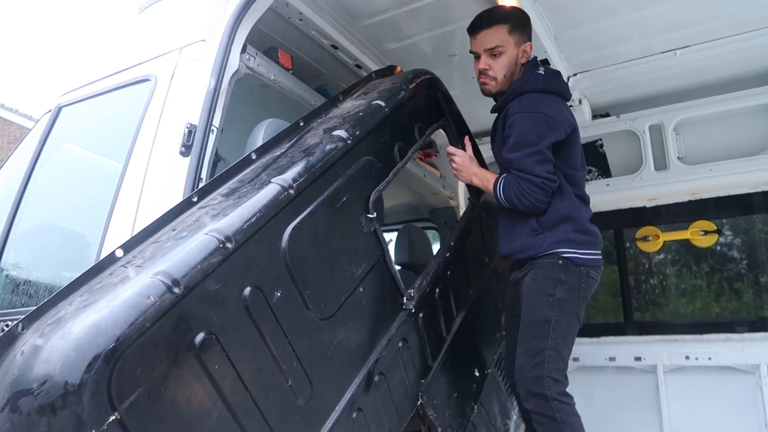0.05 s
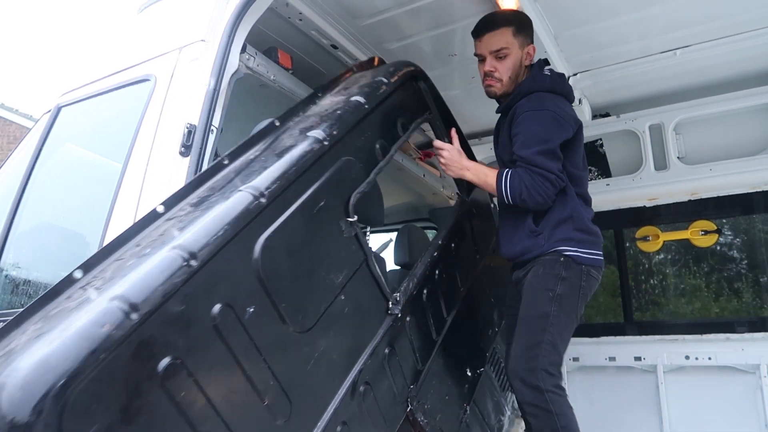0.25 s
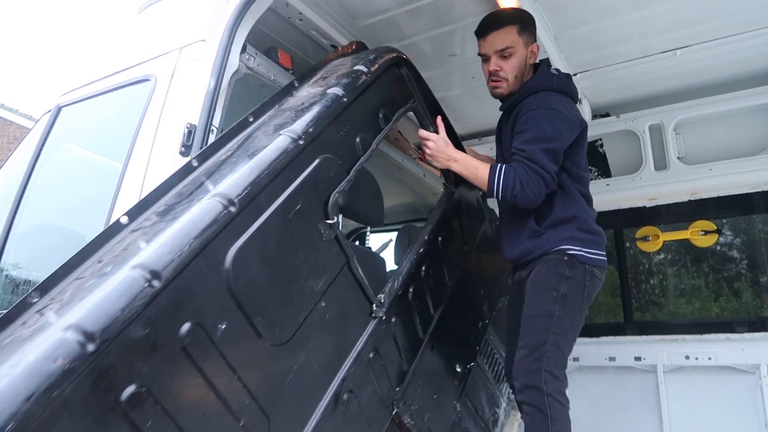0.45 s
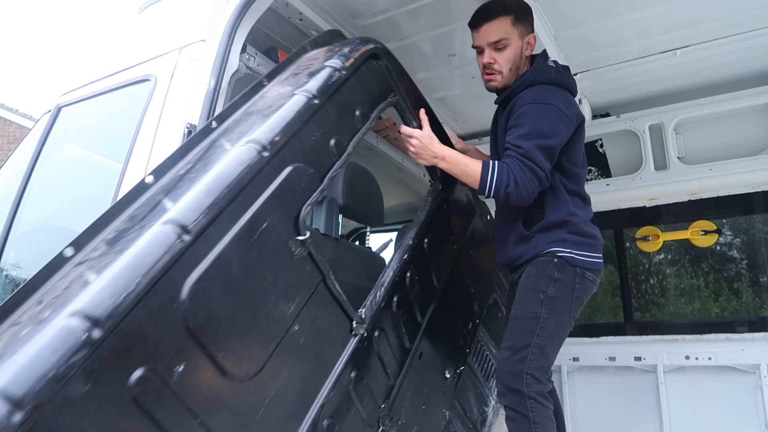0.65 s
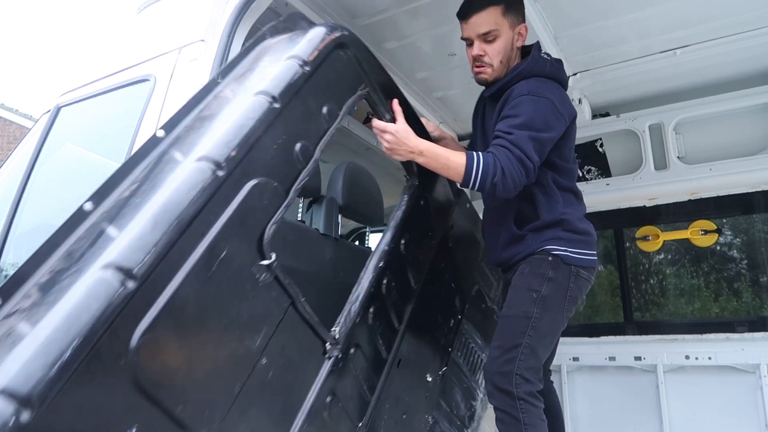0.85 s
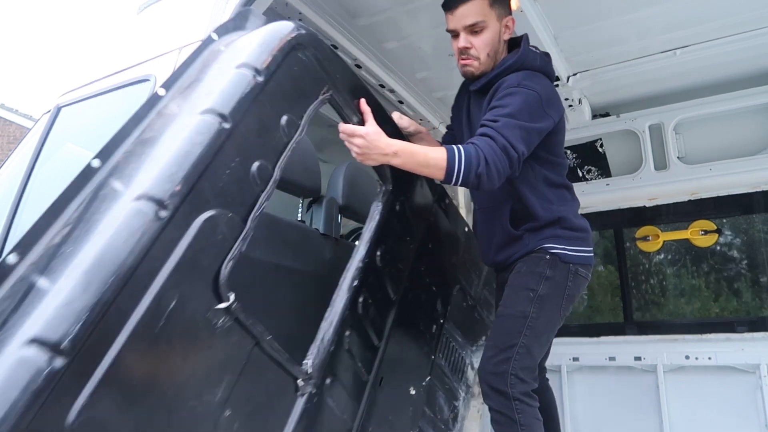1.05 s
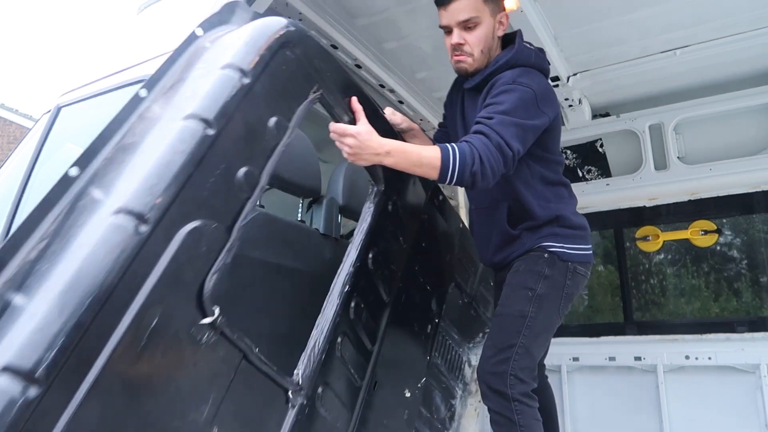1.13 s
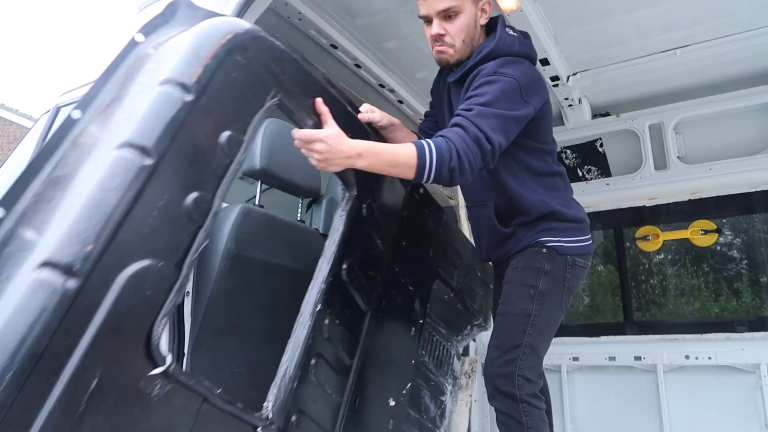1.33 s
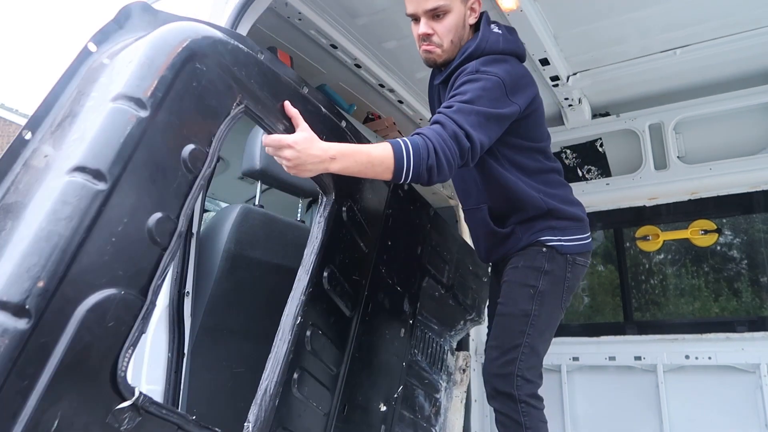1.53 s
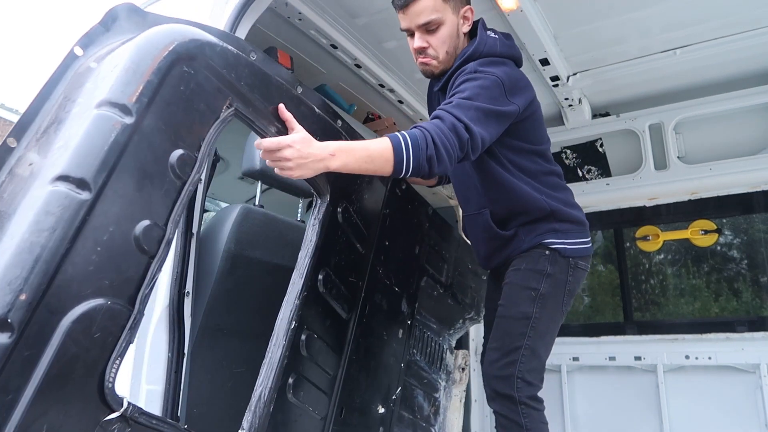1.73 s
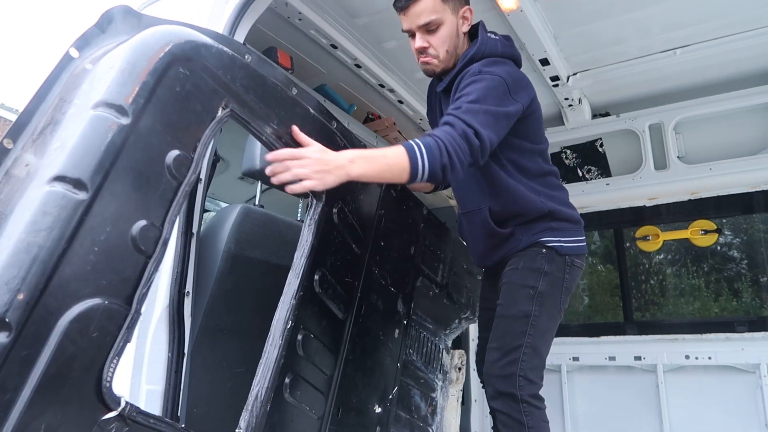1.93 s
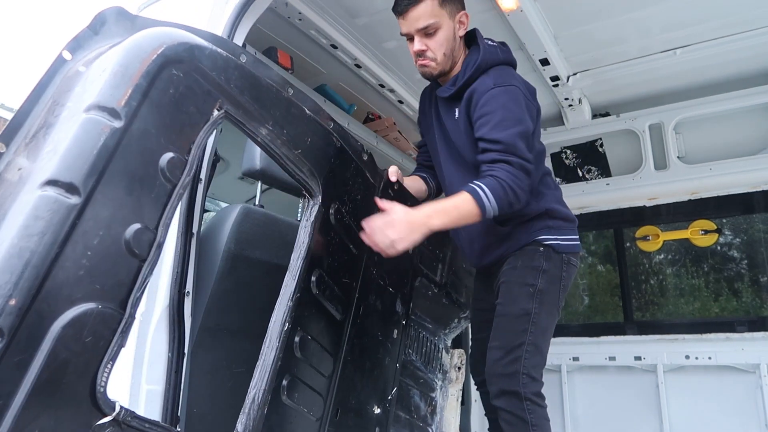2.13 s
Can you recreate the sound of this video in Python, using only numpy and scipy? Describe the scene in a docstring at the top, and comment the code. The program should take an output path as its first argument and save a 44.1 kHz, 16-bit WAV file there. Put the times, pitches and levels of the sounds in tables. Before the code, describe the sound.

Close up, a big steel sheet scrapes and judders over the floor of an empty van. Its edge keeps catching with ringing clanks and short squeaks while the sheet booms, until the drag fades into a few faint knocks.

```python
"""A large bulkhead panel is dragged across the bare cargo bay of a van, heard from close by.
Stick-slip friction at its edge drives the sheet's modes into a rumble, a scrape and brief squeaks.
Where the edge catches, impacts clank, rattle and set steel parts ringing; the sheet booms as it
buckles. The bay reverberates briefly, and a few fainter knocks and low booms follow as the scrape
dies away. Beneath it all lies a quiet outdoor background."""
import sys
import numpy as np
from scipy import signal
from scipy.fft import rfft, irfft
from scipy.io import wavfile
from scipy.ndimage import uniform_filter1d

SR = 44100
rng = np.random.default_rng(int(sys.argv[2]) if len(sys.argv) > 2 else 0)


def wav_record(signal):
    """Record a signal, one row per channel, as 16-bit PCM in the file named by sys.argv[1]."""
    frames = np.transpose(np.atleast_2d(signal))
    bounded = np.clip(frames, -1, 1)
    # unit amplitude maps onto the largest positive 16-bit level
    quanta = np.round(bounded * 32767).astype(np.int16)
    wavfile.write(sys.argv[1], SR, quanta)


N = 97020
T = np.arange(N) / SR
MID_ONLY = np.array([[1], [0]])  # signal rows are mid and side

# catches of the edge: t/s, body level/dB, clank level/dB, treble level/dB, rattle decay time/s
CATCHES = [(.229, -29.5, -29.5, -32.5, 0.045), (0.3758, -20, -18.5, -23.5, 0.0034),
           (0.386, -19, -27.5, -36, .004), (.397, -19, -20.5, -23.5, 0.0076),
           (0.4224, -20.5, -27, -19, 0.011), (.443, -24, -31, -40, 0.0039), (0.53, -29, -34, -32, .012),
           (.546, -33, -36, -35.5, 0.0062), (0.666, -39, -46, -28, 0.0068),
           (.675, -29.5, -28.5, -25.5, .022), (0.716, -24.5, -26.5, -25, 0.0059),
           (.756, -41, -33, -21, 0.018), (0.8, -32, -31, -33, 0.0039), (.875, -22.5, -27, -44, 0.011),
           (.915, -24.5, -20.5, -15.5, 0.021), (.929, -18.5, -25, -30, 0.018), (1.067, -23, -27, -52, .025),
           (1.126, -31, -22, -47, 0.0062), (1.138, -29, -26.5, -35, 0.0092),
           (1.204, -25.5, -31, -26.5, 0.026), (1.27, -26.5, -28, -34, 0.013),
           (1.425, -26.5, -31, -52, 0.014), (1.468, -41, -31.5, -36, 0.037),
           (1.523, -28.5, -24.5, -35, 0.015), (1.553, -27.5, -32, -18, 0.0027),
           (1.559, -22.5, -18, -18.5, 0.0016), (1.709, -39, -53, -40, .0014),
           (1.989, -45.5, -43.5, -43.5, 0.0044)]
# treble spectrum of an impact: f/Hz, level/dB
TREBLE_SPECTRUM = [(300, -76), (2000, -18), (3600, 9), (4800, -1), (6500, -7), (8000, -12.5), (11500, -10),
                   (15000, -11.5)]


def amp(db):
    """Amplitude ratio of a level in decibels."""
    return 10 ** (np.asarray(db) / 20)


def unit(x):
    """Normalisation to rms 1."""
    return x / np.sqrt(np.mean(x ** 2) + 1e-20)


def unit_peak(x, window=882):
    """Normalisation of a transient to a greatest short-time rms of 1 in the mid signal."""
    return x / np.sqrt(uniform_filter1d(x[0] ** 2, window).max() + 1e-20)


def value_at(points, hz):
    """Interpolation on a logarithmic frequency axis."""
    f, value = np.transpose(points)
    return np.interp(np.log(hz + 1), np.log(f), value)


def add(mix, start_s, sound):
    """Superposition of a sound on the mix from a given time."""
    part = mix[:, max(round(start_s * SR), 0):][:, :sound.shape[-1]]
    part += sound[..., :part.shape[-1]]


def convolve(x, response):
    """Convolution with an impulse response, cut to the input's length."""
    return signal.fftconvolve(np.atleast_2d(x), np.atleast_2d(response), axes=1)[:, :x.shape[-1]]


def colour(x, spectrum, size=8192):
    """Minimum-phase filtering: the phase follows from the log gain by the Hilbert transform."""
    log_gain = np.log(amp(value_at(spectrum, abs(np.fft.fftfreq(size, 1 / SR)))))
    transfer = np.exp(np.conj(signal.hilbert(log_gain)))
    return convolve(x, np.fft.ifft(transfer).real[:size // 2])


def bay_response(size=22050):
    """Reverberation: direct sound, strong early reflections and a diffuse tail that decays by band."""
    # reverberation time of the steel bay: f/Hz, T60/s
    decay_times = [(80, 0.27), (260, 0.32), (700, 0.33), (1800, 0.17), (4800, 0.23), (12000, 0.15)]
    early_s, early_db, direct_db = 0.023, 3.5, -7
    hz, t, bands = signal.stft(rng.choice([-1., 1.], (2, size)), SR, nperseg=256)
    decay = amp(-60 * t / value_at(decay_times, hz)[:, None])
    response = signal.istft(bands * decay, SR, nperseg=256)[1][:, :size]
    response *= 1 + amp(early_db) * np.exp(-T[:size] / early_s)
    response /= np.linalg.norm(response[0])
    response[0, 0] += amp(direct_db)
    return response


def panel_resonance(drive):
    """Forced vibration: each mode of the sheet is a damped resonator that adds to the drive."""
    # bending modes: f/Hz, T60/s, gain/dB
    panel_modes = [(71.2, 1, -8), (81.8, 0.54, 13.5), (113.9, 0.51, 5.5), (157.7, 0.36, 0), (205.7, 0.3, 0),
                   (265.5, 0.42, -6.5), (385.7, 0.49, 4), (472, 0.077, -10.5), (630, 0.73, -7),
                   (737, 0.46, -5), (1079, 0.11, -2.5), (1210, 0.57, -1), (1410, 0.81, -10),
                   (1590, 0.88, -12), (2220, 0.14, -4), (2484, 0.44, -7), (3870, 0.22, 1)]
    out = drive
    for hz, t60, db in panel_modes:
        q = hz * t60 * np.pi / np.log(1000)
        out = out + amp(db) * signal.lfilter(*signal.iirpeak(hz, q, SR), drive)
    return out


def impulses(per_s, size, spread_db=4):
    """A Poisson process of small impacts of uneven strength."""
    strength = amp(spread_db * np.minimum(rng.exponential(1, size), 4))
    return strength * rng.choice([-1., 1.], size) * (rng.random(size) < per_s / SR)


def outdoors(level_db=-45):
    """Ambient noise, mostly low in pitch and only partly coherent between the two microphones."""
    # background spectrum: f/Hz, level/dB
    outdoor_spectrum = [(25, -39), (51, -2), (86, 10.5), (236, -7), (461, -10), (808, -13.5), (2230, -20.5),
                        (8720, -43), (12000, -41), (14900, -74)]
    # stereo width of the background: f/Hz, side level re mid/dB
    outdoor_width = [(60, -40), (370, -10), (2300, -10), (14000, 7)]
    mid, side = amp(level_db) * unit(colour(rng.standard_normal((2, N)), outdoor_spectrum))
    return mid, colour(side, outdoor_width)[0]


def tick(start_s=1.854, hz=1200, level_db=-27, decay_s=.0008):
    """A heavily damped oscillation right at the microphone: one small dry tick."""
    t = np.maximum(T - start_s, 0)
    return amp(level_db) * np.sin(2 * np.pi * hz * t) * np.exp(-t / decay_s)


def edge_squeaks(mix, reverb_db=5.5, size=11025):
    """Frictional excitation: each run of fast slips on bare metal drives one resonance of the edge."""
    # skids: t/s, level/dB, f/Hz, duration/s, quality factor Q
    skids = [(.376, -27, 3320, 0.0065, 7.6), (.423, -38.5, 4820, .02, 7.6), (.675, -25.5, 2710, 0.011, 8.7),
             (.665, -42, 11200, 0.039, 1.1), (.756, -33.5, 4660, 0.014, 18), (.756, -31.5, 3140, 0.013, 26),
             (.756, -28.5, 2410, 0.013, 12), (.752, -40, 5400, 0.033, 1.1), (.748, -44, 11500, 0.037, 3.1),
             (.789, -32.5, 1047, 0.013, 9), (1.072, -42, 11500, .032, 2.8), (1.137, -24.5, 977, 0.021, 9.6),
             (1.147, -39, 2300, .008, 9.6), (1.203, -41, 11400, 0.013, 4.5),
             (1.265, -44.5, 11900, 0.03, 6.2), (1.267, -40.5, 4200, .044, 4.5),
             (1.55, -21, 1720, 0.0053, 3.4), (1.558, -21.5, 1940, .018, 8.8),
             (1.993, -48.5, 2280, 0.021, 3.3)]
    for start_s, db, hz, length_s, q in skids:
        progress = np.minimum(T[:size] / length_s, 1)
        force = rng.standard_normal(size) * np.sin(np.pi * np.sqrt(progress))
        resonator = signal.iirpeak(hz, q, SR)
        ring = signal.lfilter(*resonator, signal.lfilter(*resonator, force))
        echo = amp(reverb_db) * convolve(ring, bay_response())
        add(mix, start_s, amp(db) * unit_peak(ring * MID_ONLY + echo))


def steel_rings(mix, rise_s=0.0056, reverb_db=-16, size=22050):
    """Free vibration: hollow steel parts struck by the edge swell into their modes and ring out."""
    # modes of the van's pillar and sill: f/Hz, level/dB, T60/s
    pillar = [(290.2, -5.5, 0.49), (390, 2.5, 0.27), (734.7, 2.5, 0.45), (1308, 0, 0.25), (1615, -9, 0.37),
              (2207, -15, .3), (2509, -2, 0.15)]
    sill = [(570.5, -2.5, 0.2), (621, -0.5, 0.31), (770, -9, 0.12), (1144, 0, 0.18), (1220, -7, 0.27),
            (1930, -13, 0.12), (2594, -5, 0.21), (2880, -7.5, 0.23), (3230, -5, 0.12), (3450, -15, .08),
            (3890, -23, 0.13)]
    blows = [(.3755, -20.5, pillar), (.4225, -24.5, pillar), (.915, -19.5, sill)]
    t = T[:size]
    for start_s, level_db, part in blows:
        ring = sum(amp(db - 60 * t / t60) * np.sin(2 * np.pi * (hz * t + rng.random()))
                   for hz, db, t60 in part)
        ring *= 1 - np.exp(-t / rise_s)
        echo = amp(reverb_db) * convolve(ring, bay_response())
        add(mix, start_s, amp(level_db) * unit_peak(ring * MID_ONLY + echo))


def contact_cracks(mix, decay_s=0.0024, size=4096):
    """Nonlinear contact: metal on metal begins with a dry crack that grows faster than the blow."""
    # spectrum of the crack: f/Hz, level/dB
    crack_spectrum = [(150, -24), (700, -3), (1500, 13.5), (2400, -8), (3700, -12), (5000, -22),
                      (8000, -30), (15000, -38)]
    hard_blow_db, growth = -16, 2.35  # growth in dB of crack per dB of blow
    for start_s, _, clank_db, treble_db, _ in CATCHES:
        burst = rng.choice([-1., 1.], (2, size)) * np.exp(-T[:size] / decay_s)
        bands = [(clank_db, -9, crack_spectrum), (treble_db, -20.5, TREBLE_SPECTRUM)]
        for blow_db, hard_crack_db, spectrum in bands:
            gain = amp(hard_crack_db + growth * (blow_db - hard_blow_db))
            add(mix, start_s, gain * unit_peak(colour(burst, spectrum), window=88))


def edge_clanks(mix, rattle_per_s=900, rattle_db=4, treble_trim_db=-14, size=22050):
    """Impact excitation: at each catch, one hard contact and a dying rattle ring the panel and bay."""
    # spectra of the impact's low body and metallic midrange: f/Hz, level/dB
    body_spectrum = [(50, -39), (120, -2), (300, 4), (600, 8), (1000, -1), (1600, -3), (4000, -76)]
    clank_spectrum = [(100, -41.5), (700, -4), (1400, 4.5), (2300, 5), (3300, -7.5), (4500, -30.5),
                      (8000, -44.5)]
    for start_s, body_db, clank_db, treble_db, decay_s in CATCHES:
        rattle = impulses(rattle_per_s, size) * np.exp(-T[:size] / decay_s)
        force = amp(rattle_db) * rattle / (np.linalg.norm(rattle) + 1e-9)
        force[0] += 1  # the first contact
        ring = panel_resonance(convolve(force, bay_response()))
        bands = [(body_db, body_spectrum), (clank_db, clank_spectrum),
                 (treble_db + treble_trim_db, TREBLE_SPECTRUM)]
        for db, spectrum in bands:
            add(mix, start_s, amp(db) * unit_peak(colour(ring, spectrum)))


def sheet_booms(mix, gain_db=1.5, reverb_db=-5.5, size=22050):
    """Buckling: the sheet makes a few heavily damped swings and springs back as the echo builds."""
    # flexures: t/s, relative level/dB, f/Hz, rebound delay/s, rebound level re first swing/dB
    flexures = [(.006, -33, 86, 0.055, -1), (.349, -29, 117, 0.018, -6), (.378, -35.5, 200, 0.019, -18),
                (.572, -21.5, 175, .013, -0.5), (.602, -11.5, 273, .0112, -3), (.603, -19.5, 170, 0.012, 4),
                (.64, -26, 165, 0.018, 5), (.713, -16.5, 214, 0.011, -26), (.826, -25, 342, 0.0086, 4.5),
                (.875, -13, 261, 0.0065, -11), (.885, -11.5, 167, 0.011, -6),
                (1.058, -15.5, 266, 0.0077, -1.5), (1.128, -21, 280, .011, 2), (1.195, -23.5, 223, .014, 4),
                (1.252, -30, 150, 0.0193, 7), (1.31, -28.5, 160, .011, 6), (1.417, -19, 253, .014, -4.5),
                (1.499, -19, 216, .018, -1), (1.704, -27.5, 257, 0.023, -1), (1.757, -40, 187, .02, -15),
                (1.971, -30.5, 257, 0.029, -11)]
    rise_s, echo_build_s = 0.0032, 0.026
    overtone_ratio, overtone_db = 2.23, -15
    build_up = np.minimum(T[:size] / echo_build_s, 1) ** 2
    for start_s, db, hz, rebound_s, rebound_db in flexures:
        direct = 0
        for delay_s, gain in [(0, 1), (rebound_s, amp(rebound_db))]:
            t = np.maximum(T[:size] - delay_s, 0)
            phase = 2 * np.pi * hz * t
            swing = np.sin(phase) + amp(overtone_db) * np.sin(overtone_ratio * phase)
            direct = direct + gain * swing * t / rise_s * np.exp(1 - t / rise_s)
        echo = convolve(direct, bay_response() * build_up)
        echo *= amp(reverb_db) * np.linalg.norm(direct) / np.linalg.norm(echo[0])
        add(mix, start_s, amp(db + gain_db) * (direct * MID_ONLY + echo))


def panel_drag(contacts=4, slips_per_s=1000, grit_per_s=250):
    """Stick-slip friction: contact points along the edge take turns to shake the sheet in bursts."""
    # course of the drag: t/s, rumble level/dB, scrape level/dB
    drag_levels = [(0, -48, -43), (.1, -51, -49.5), (0.179, -40.5, -41), (.24, -34, -28),
                   (0.308, -37, -30.5), (.37, -20, -25.5), (.451, -41.5, -23.5), (.52, -37, -38.5),
                   (.6, -25.5, -30.5), (.78, -32, -33.5), (.875, -25, -28), (.95, -28, -35.5),
                   (1.0, -37, -28), (1.05, -29.5, -26), (1.17, -23, -29), (1.3, -30, -29.5),
                   (1.37, -29, -31), (1.55, -33.5, -29.5), (1.62, -40.5, -37.5), (1.8, -42, -53),
                   (1.88, -61.5, -69), (2.2, -49.5, -68)]
    # course of the fine sliding hiss: t/s, level/dB
    hiss_levels = [(0, -43.5), (.1, -50), (.3, -41), (.5, -49.5), (.8, -39.5), (.98, -84), (1.09, -34.5),
                   (1.15, -57), (1.28, -36.5), (1.37, -69), (2.2, -90)]
    # spectra of the three friction layers: f/Hz, level/dB
    rumble_spectrum = [(25, -26), (45, -62), (66, 3.5), (90, -9), (115, 6), (190, -1), (280, -0.5),
                       (400, -5.5), (800, -39.5), (2000, -56)]
    scrape_spectrum = [(60, -23), (250, -15.5), (450, 4), (800, 0), (1300, -1.5), (2300, -2), (3300, -15),
                       (5000, -23), (8000, -35), (12000, -31.5), (15000, -37)]
    hiss_spectrum = [(500, -72), (2000, 3), (3000, 4.5), (4500, -8), (6000, -13.5), (8000, -17.5),
                     (11000, -19), (13000, -11), (15000, -24)]
    judder_hz, judder_db, turns_per_s = 46, 1.5, 1.525
    times, rumble_db, scrape_db = np.transpose(drag_levels)
    layers = [((times, rumble_db), rumble_spectrum, slips_per_s),
              ((times, scrape_db), scrape_spectrum, slips_per_s),
              (np.transpose(hiss_levels), hiss_spectrum, grit_per_s)]
    out = 0
    for level_curve, spectrum, per_s in layers:
        drive = 0
        for k in range(contacts):
            judder = np.interp(T * judder_hz, np.arange(N), rng.standard_normal(N))
            load = abs(np.sin(np.pi * (T * turns_per_s + k / contacts)))
            force = impulses(per_s / contacts, N) * amp(judder_db * judder) * load
            drive = drive + convolve(force, bay_response())
        layer = colour(panel_resonance(drive), spectrum)
        running_rms = np.sqrt(abs(uniform_filter1d(layer[0] ** 2, size=2600)) + 1e-12)
        out = out + layer / running_rms * amp(np.interp(T, *level_curve))
    return out


def scene(left_lag_s=1.4e-5):
    """Mid-side stereophony: the sources superpose, and sum and difference give left and right."""
    # stereo width of the sound in the bay: f/Hz, side gain/dB
    bay_width = [(60, -91), (250, -30.5), (1000, -31), (2500, -49), (4000, -4.5), (6000, -5), (9000, 8),
                 (14000, -6.5)]
    mix = panel_drag()
    for source in (edge_clanks, steel_rings, sheet_booms, edge_squeaks, contact_cracks):
        source(mix)
    outdoor_mid, outdoor_side = outdoors()
    mid = mix[0] + outdoor_mid + tick()
    side = colour(mix[1], bay_width)[0] + outdoor_side
    lag = np.exp(-2j * np.pi * np.fft.rfftfreq(N, 1 / SR) * left_lag_s)
    return np.array([irfft(rfft(mid + side) * lag, N), mid - side])


def record(dry):
    """Linear filtering by the microphone: a treble notch, a low cut and a band limit."""
    # microphone response: f/Hz, gain/dB
    mic_response = [(20, -2), (7500, -2.5), (8600, -13.5), (9400, -19.5), (10200, -4), (14000, -10),
                    (15000, -17)]
    low_cut_hz, band_limit_hz = 93.4, 15050
    low_cut = signal.butter(2, low_cut_hz, "high", fs=SR, output="sos")
    band_limit = signal.firwin(511, band_limit_hz, window=("kaiser", 9), fs=SR)
    heard = signal.sosfilt(low_cut, colour(dry, mic_response))
    return signal.oaconvolve(heard, band_limit[None], "same")


dry = scene()
out = record(dry)
wav_record(out)
```